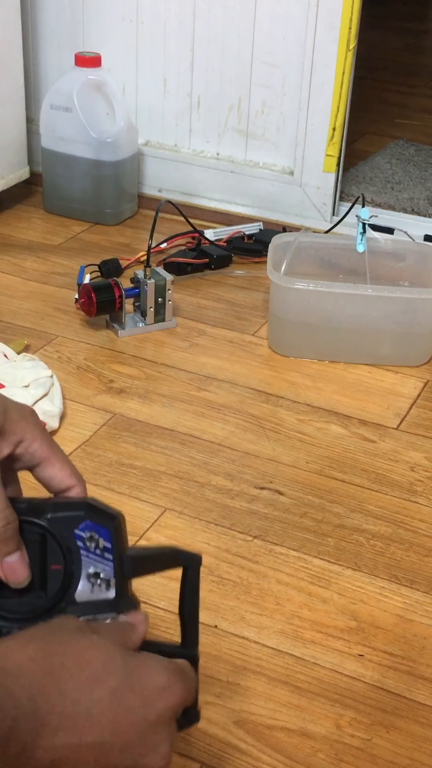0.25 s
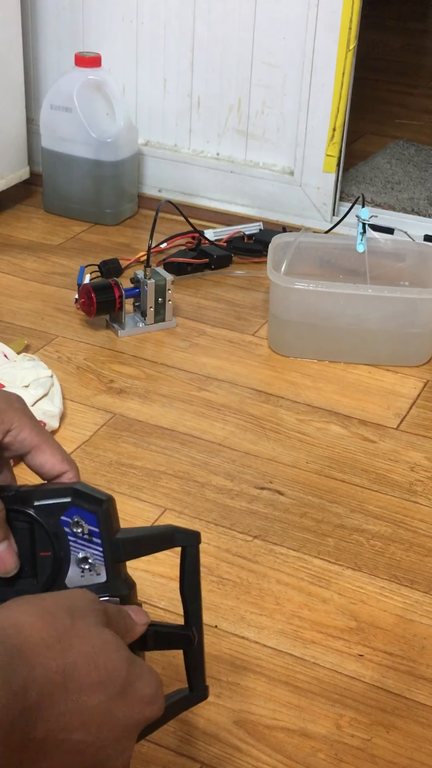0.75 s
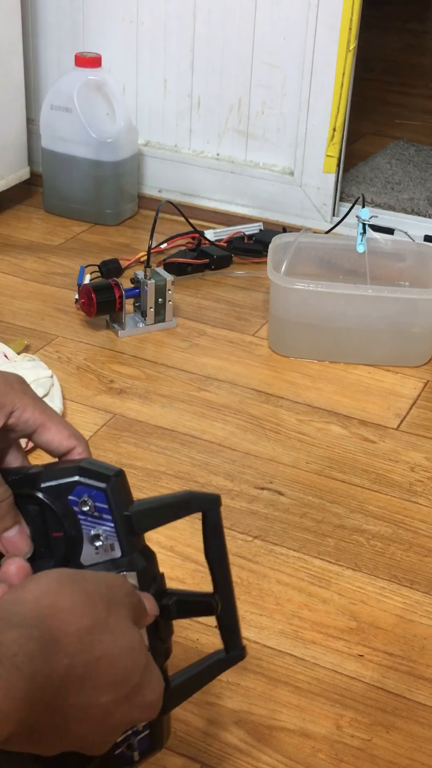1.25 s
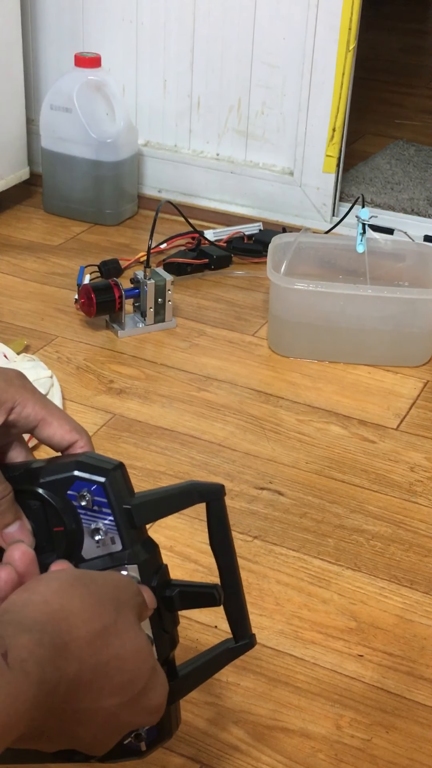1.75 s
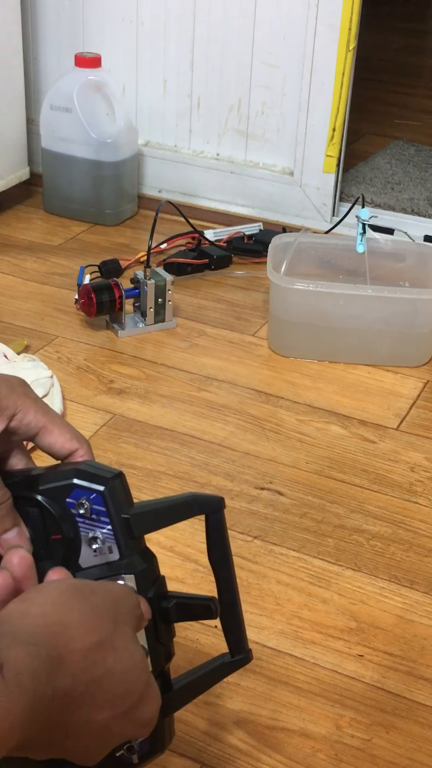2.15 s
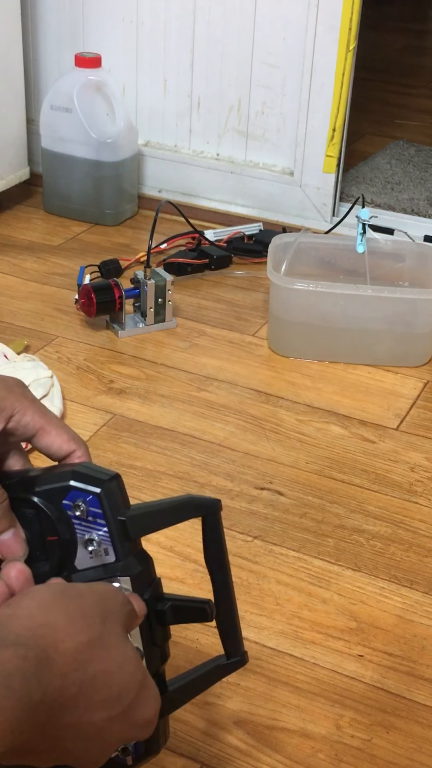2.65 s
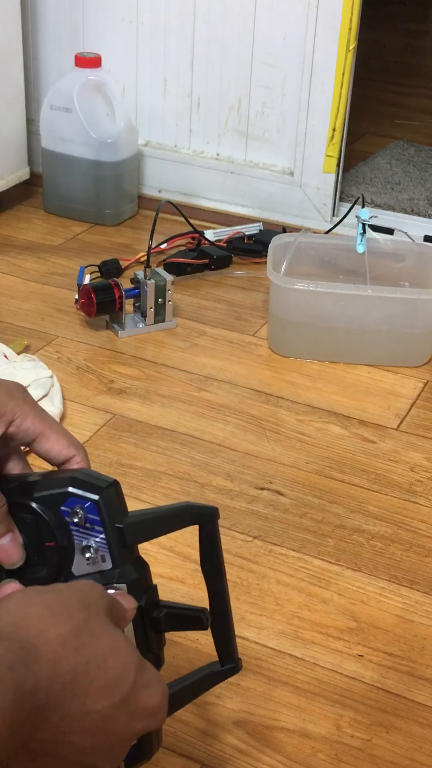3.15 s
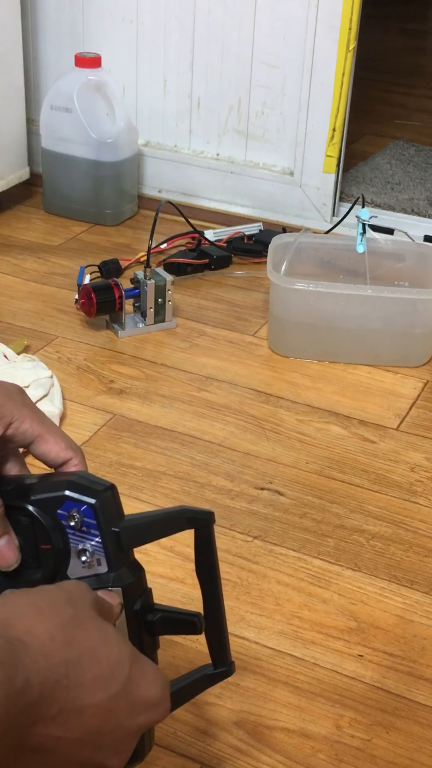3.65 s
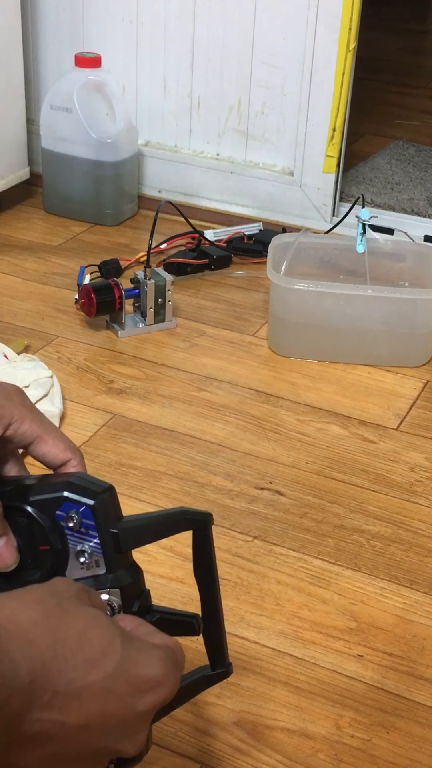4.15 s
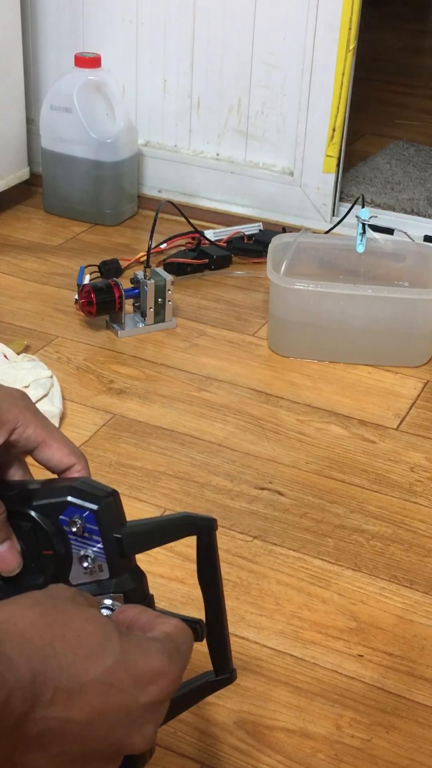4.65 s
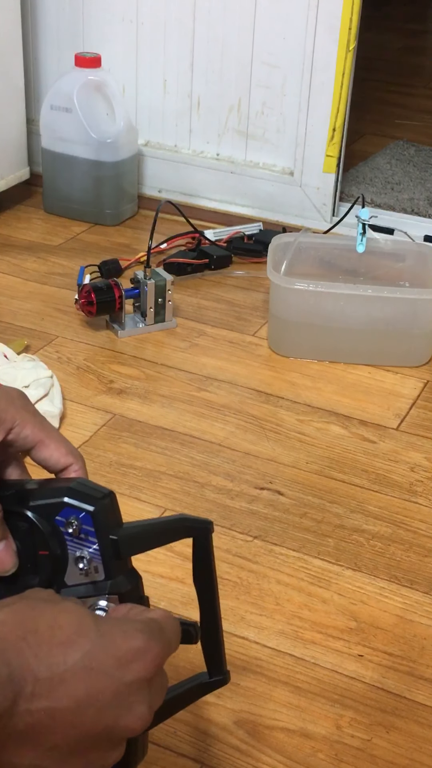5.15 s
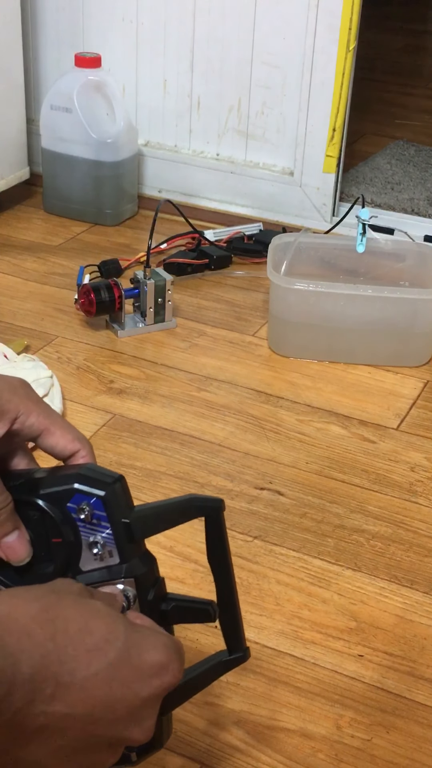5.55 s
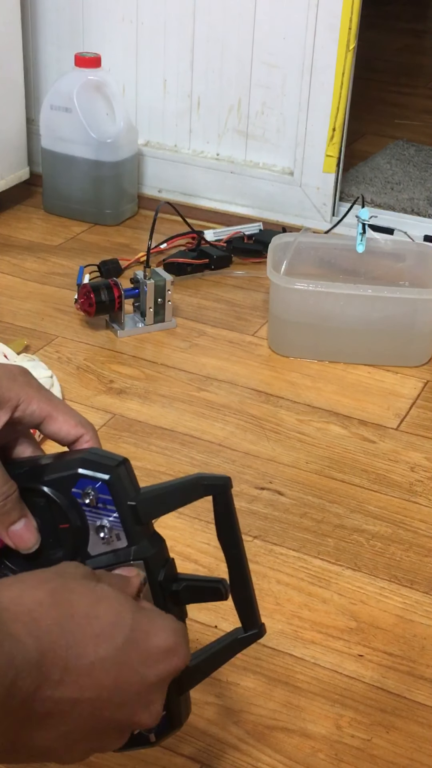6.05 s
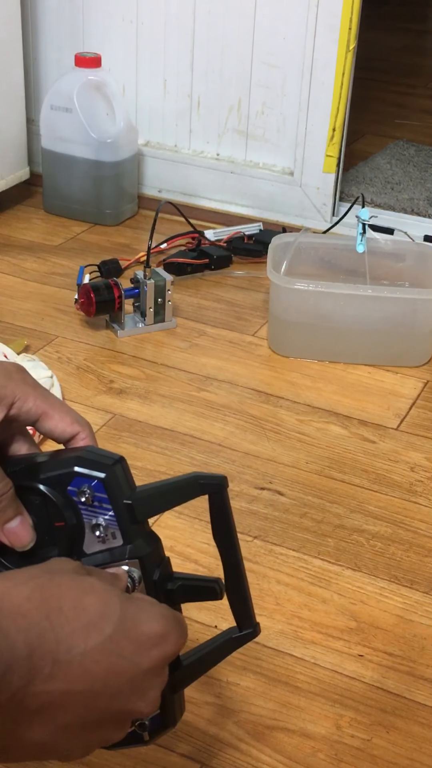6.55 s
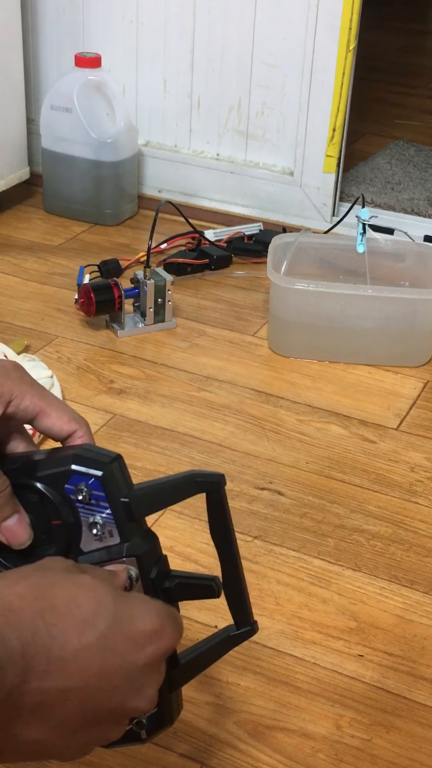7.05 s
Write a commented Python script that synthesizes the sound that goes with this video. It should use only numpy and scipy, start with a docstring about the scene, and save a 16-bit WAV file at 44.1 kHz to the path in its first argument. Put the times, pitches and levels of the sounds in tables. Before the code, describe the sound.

Steady electric whirring with tiny clicks stops for a second, a hand swishes on plastic, then the motor resumes as dishes clatter far off.

```python
"""A motor-driven gear pump whines, drones and whirrs on a wooden floor, with small ticks on top.
It falls quiet for about a second, then restarts with a thin whistle from its speed controller.
Further off in an echoing house come knocks, thumps, crockery, an appliance hum and a rumble; a hand swishes.
The pump and the swish are shaped noise, the whistle is narrow noise, the hum and ticks are sine tones.
Knocks and thumps are fading noise; crockery adds ringing sine tones to it."""
import sys
import numpy as np
from scipy import signal
from scipy.fft import rfft, irfft, next_fast_len
from scipy.io import wavfile
from scipy.ndimage import uniform_filter1d, map_coordinates

SR = 44100
rng = np.random.default_rng(int(sys.argv[2]) if len(sys.argv) > 2 else 0)


def transcribe(u):
    """Save the signal u as a 16-bit wav file named by the first command-line argument.

    u: samples, shape (n,) or (channels, n), limited to [-1, 1]; the rate is SR.
    q: integer samples, one column per channel.
    """
    v = np.clip(np.atleast_2d(u).T, -1, 1)
    q = np.round(v * 32767).astype(np.int16)
    wavfile.write(sys.argv[1], SR, q)


N = 322812
T = np.arange(N) / SR  # time of every sample in seconds

# In resonance tables each row is: centre in Hz, width in Hz, strength in dB.
# The pump housing, before its response is raised to a power.
HOUSING_MODES = [(2530, 50, -7), (2586, 28, -1), (2623, 30, 0), (2700, 60, -6), (2830, 200, -11)]
# Floor boards under the pump, before squaring. Each row: centre in Hz, width in Hz, strength in dB.
BOARD_MODES = [(82.4, 34, -4), (300.7, 20.7, -0.5), (370, 38, 0), (587.4, 32, -2.5), (940, 36, -3),
               (1054, 30, -7)]
# The motor bell. Each row: centre in Hz, width in Hz, strength in dB.
BELL_MODES = [(5700, 180, -11), (8800, 120, -13), (11300, 160, -9), (14800, 230, -24)]
# The whirr before the bell colours it. Each row: frequency in Hz, relative level in dB per Hz.
WHIRR_SPECTRUM = [(290, -46), (500, -2.5), (586, -4.5), (659, 0), (933, -2), (2190, -4), (2610, -2),
                  (3200, -14.5), (7640, -16.5), (8830, -15.5), (16000, -20)]
# Load on the pump: it runs, coasts, rests, crawls and picks up again.
# Each row: time in seconds, level in dB relative to full speed.
LOAD_CURVE = [(0, 0), (4.26, 0), (4.38, -1.5), (4.5, -7), (4.6, -30), (5.55, -23), (5.61, -5), (6.45, -3),
              (6.95, 0), (7.32, 0.5)]

# Steady air of the house. Each row: frequency in Hz, relative level in dB per Hz.
AIR_SPECTRUM = [(15, -26), (25, 2.5), (145, -8), (175, -8.5), (293, -2), (416, -2.5), (624, -7), (695, -9),
                (775, -6), (1260, -5.5), (2840, -15), (3920, -12.5), (7710, -17), (16000, -30)]
# Appliance tones. Each row: frequency in Hz, peak level in dB before the slow wavering.
HUM_TONES = [(177.6, -59.5), (414.5, -53), (506.0, -61), (705.2, -63), (823.6, -57.5), (963.6, -61),
             (1238, -55.5), (2062, -59.5)]
# Distant rumble. Each row: time in seconds, level in dB.
RUMBLE_CURVE = [(0, -60), (1.5, -61), (3, -70), (4.3, -56), (4.7, -65.5), (7.32, -68)]

# Clear ticks of the coupling. Each row: start in seconds, starting strength in dB, pitch in Hz.
CLEAR_TICKS = [(0.6195, -28, 6030), (0.823, -35, 8930), (0.8844, -31, 5900), (1.7739, -35, 8940),
               (2.2298, -28, 5900), (2.4703, -28, 8900), (2.5721, -34, 8930), (2.9442, -32, 8930),
               (3.131, -34, 8920), (3.707, -35, 6200), (3.917, -30, 5860), (3.9789, -31, 8760),
               (4.4844, -31, 6160), (5.6094, -37, 8000), (6.2794, -29, 8300)]

# Dull knocks. Each row: start in seconds, level in dB, rise in seconds, treble tilt in dB per octave.
KNOCK_EVENTS = [(.738, -32, .012, -2.5), (.79, -35.5, 0.024, -2), (1.517, -25.5, 0.016, -2),
                (1.555, -31.5, 0.011, -5), (1.802, -28, 0.015, -2.1), (1.845, -30, 0.047, -5.5),
                (1.905, -26.5, 0.011, -1), (1.975, -26, 0.027, 1.1), (2.03, -25, 0.016, 1.5),
                (2.07, -35.5, .0042, -0.5), (2.69, -35, 0.031, -0.3), (5.975, -29.5, 0.024, -10)]
# Knock colour before the cupboard rings. Each row: frequency in Hz, relative level in dB per Hz.
KNOCK_SPECTRUM = [(88, -44), (150, -26), (205, -23), (301, -6.5), (726, -10.5), (973, -8.5), (1150, -8),
                  (1850, -10.5), (2390, -14.5), (4540, -19.5), (12000, -44.5), (15600, -71), (22000, -120)]
# The knocked cupboard. Each row: centre in Hz, width in Hz, strength in dB.
CUPBOARD_MODES = [(283, 100, -1), (980, 44, -1.5), (1690, 250, 2), (3700, 83, -4)]
# How fast each pitch of a blow dies away. Each row: frequency in Hz, share of the decay time.
DECAY_SHARE = [(200, 0.9), (1500, 1.07), (7000, 0.98), (11000, 0.7), (16000, 0.61)]
# Floor thumps. Each row: start in seconds, level in dB.
THUMP_EVENTS = [(0.74, -34), (0.901, -35), (1.9, -32), (2.031, -36), (5.588, -30), (5.976, -25),
                (6.023, -42)]
# Floor joists, before squaring. Each row: centre in Hz, width in Hz, strength in dB.
JOIST_MODES = [(88, 39, 5.5), (144, 63, -0.5), (60, 20, -31), (243, 43, 0.5)]

# Clatter of crockery. Each row: start in seconds, level in dB, rise in seconds, treble tilt in dB per octave.
CLATTER_EVENTS = [(.897, -30, 0.0085, -3), (1.137, -32.5, 0.0072, 0.5), (1.165, -39.5, 0.0077, 1.1),
                  (5.97, -17.5, 0.013, -0.36), (6.03, -28, 0.01, 0.7), (6.275, -43, .0054, 9)]
# Clatter colour before the tilt. Each row: frequency in Hz, relative level in dB per Hz.
CLATTER_SPECTRUM = [(71, -46), (120, -20), (250, -8), (400, -10), (569, -10), (900, -6), (1550, -7),
                    (2500, -8.5), (4000, -11), (7000, -11.5), (9500, -15), (12000, -23.5), (16000, -26)]
# Ringing tones of a bowl. Each row: pitch in Hz, relative level in dB, time to fall 60 dB in seconds.
BOWL = [(537, -6, 0.19), (924, 3, 0.25), (1890, 1, 0.23), (2310, -2.5, 0.21), (3155, -3.5, 0.25),
        (4010, -7.5, 0.21), (4750, -22, .3), (5254, -19, .3), (6440, -29, .3)]
# Ringing tones of a cup. Each row: pitch in Hz, relative level in dB, time to fall 60 dB in seconds.
CUP = [(536, -9, 0.17), (927, -3.5, 0.27), (1563, -3.5, 0.25), (1850, -19, 0.55), (2299, -17, 0.5),
       (2464, -5.5, 0.27), (3540, -26, 0.49), (4720, -14, 0.27), (7350, -25, 0.47), (9600, -34, 0.32)]
# Ringing tones of a plate. Each row: pitch in Hz, relative level in dB, time to fall 60 dB in seconds.
PLATE = [(673, -8.5, 0.44), (865, -4.5, 0.43), (940, -6, 0.22), (1475, -27, 0.35), (1593, 1, 0.46),
         (1810, -12, 0.65), (2180, -28, 0.26), (3520, -13, 0.5), (3900, -8, 0.46), (5320, -12, 0.46),
         (6470, -16.5, 0.56), (6840, -18, 0.38), (8420, -13, 0.4), (11300, -16, 0.37)]
# Pieces being set down. Each row: table of ringing tones, start in seconds, level in dB.
PIECES_SET_DOWN = [(BOWL, .897, -20), (BOWL, 0.97, -33.5), (CUP, 1.138, -19), (CUP, 1.165, -27.5),
                   (PLATE, 5.97, -13)]

# Skin rubbing on plastic. Each row: frequency in Hz, relative level in dB per Hz.
SKIN_SPECTRUM = [(600, -10), (1300, 5.5), (2300, -13), (3800, -17), (5000, -8), (10000, -14), (15000, -21)]

# Whistles while the motor crawls. Each row: start in seconds, end in seconds, level in dB.
WHISTLE_EVENTS = [(5.55, 5.91, -48), (6.1, 6.447, -48.5)]
# The whistle's tone, before squaring. Each row: centre in Hz, width in Hz, strength in dB.
WHISTLE_LOWER = [(7450, 450, -3), (7920, 400, 0)]
# The octave above it, before squaring. Each row: centre in Hz, width in Hz, strength in dB.
WHISTLE_UPPER = [(15200, 350, -3), (15640, 350, 0)]

SHAFT_HZ = 41.4  # average turns per second
WHINE_DB, DRONE_DB, WHIRR_DB = -44, -45.5, -46  # at full speed
DRONE_FOLLOWS, WHIRR_FOLLOWS = 1.2, 0.48  # dB for each dB of load
AIR_DB = -43.5
FAINT_DB, FAINT_SPREAD_DB = -47, 17  # lowest strength of faint ticks at 6000 Hz and full speed; random extra
KNOCK_T60_S, CLATTER_T60_S, THUMP_T60_S = 0.43, 0.47, 0.46  # seconds to fall 60 dB; blows scale by pitch
SOFT_DB, EARLY_PER_DB = -36.5, 0.04  # harder blows than this stand out in their first arrivals
SLIDE_S, SLIDE_DB = 4.88, -39  # fastest moment of the hand, and the level there
SLIDE_RISE_DB_PER_S, SLIDE_FALL_DB_PER_S = 190, 120
OCTAVE_DB = -3.5  # upper whistle band against the lower one
WHISTLE_ATTACK_S, WHISTLE_RELEASE_S = 0.028, 0.046
TOP_HZ = 15750  # nothing is kept from here up


def amp(db):
    """Turns a level in dB into a gain."""
    return 10 ** (np.asarray(db) / 20)


def unit(x):
    """Scales a sound to an average (rms) strength of 1."""
    return x / np.sqrt(np.mean(x ** 2) + 1e-20)


def noise(size=N):
    """White noise: every frequency equally strong."""
    return rng.standard_normal(size)


def along(points, hz):
    """Reads a value between (Hz, value) points, on a log frequency axis."""
    f, v = np.transpose(points)
    return np.interp(np.log(hz + 1), np.log(f + 1), v)


def curves(rows):
    """Draws one value per sample for each column after the time; -120 outside the rows."""
    s, *cols = np.transpose(rows)
    return [np.interp(T, s, c, left=-120, right=-120) for c in cols]


def wobble(rate, size=N):
    """A smooth random curve through `rate` random points a second."""
    points = noise(int(size * rate / SR) + 4)
    return map_coordinates(points, [np.arange(size) * rate / SR])


def filtered(x, response):
    """Changes each frequency of x by the response at that frequency."""
    m = next_fast_len(len(x) + 8192)  # spare room for the ringing
    spectrum = rfft(x, m) * response(np.fft.rfftfreq(m, 1 / SR))
    return irfft(spectrum, m)[:len(x)]


def body(modes):
    """Response of an object with a few resonances, added with alternating signs."""
    def response(f):
        total = 0
        for k, (centre, width, db) in enumerate(modes):
            resonance = 1j * f * width / (centre * centre - f * f + 1j * f * width)
            total = total + (-1) ** k * amp(db) * resonance
        return total
    return response


def colour(points):
    """Response that follows a (Hz, dB) spectrum."""
    return lambda f: amp(along(points, f))


def ringing_noise(modes, size=N):
    """Noise through resonances; squaring the response makes each one stand out more sharply."""
    return unit(filtered(noise(size), lambda f: body(modes)(f) ** 2))


def add(out, s, sound):
    """Mixes a sound in at time s."""
    part = out[round(s * SR):][:len(sound)]
    part += sound[:len(part)]


def patchy(depth_db):
    """White noise with patches of random gain in time and frequency."""
    z = signal.stft(noise(N + 512), nperseg=512)[2]
    field = uniform_filter1d(noise(z.shape), size=7, axis=0)
    field = uniform_filter1d(field, size=8, axis=1)
    return signal.istft(z * amp(depth_db * unit(field)), nperseg=512)[1][:N]


def pump():
    """Gear teeth scrape twice a turn; the noise rings housing and floor boards."""
    load_db, = curves(LOAD_CURVE)
    turn = 2 * np.pi * np.cumsum(SHAFT_HZ * (1 + 0.00548 * wobble(2.995))) / SR
    mesh = 1 + .06 * np.cos(turn) + .17 * np.cos(2 * turn) + .11 * np.cos(4 * turn)
    housing, bell = body(HOUSING_MODES), body(BELL_MODES)
    whine = mesh * unit(filtered(noise(), lambda f: np.abs(housing(f)) ** 1.31))
    drone = ringing_noise(BOARD_MODES)
    whirr_response = lambda f: colour(WHIRR_SPECTRUM)(f) * (1 + np.abs(bell(f)))
    whirr = unit(filtered(mesh * patchy(depth_db=1.5), whirr_response))
    # each part wavers a little in level by itself
    whine_gain = amp(WHINE_DB + load_db + 0.42 * wobble(9.5))
    drone_gain = amp(DRONE_DB + DRONE_FOLLOWS * load_db + 0.28 * wobble(9))
    whirr_gain = amp(WHIRR_DB + WHIRR_FOLLOWS * load_db + 0.2 * wobble(11))
    return whine_gain * unit(whine) + drone_gain * drone + whirr_gain * whirr


def house():
    """Wavering sine tones of an appliance over the steady, noisy air of the house."""
    tones = np.zeros(N)
    for hz, db in HUM_TONES:
        tones += amp(db) * np.sin(2 * np.pi * hz * T + 0.67 * wobble(4))
    air = unit(filtered(patchy(depth_db=1.5), colour(AIR_SPECTRUM)))
    return amp(2.0 * wobble(4.33)) * tones + amp(AIR_DB + 0.33 * wobble(3.0)) * air


def rumble():
    """Deep noise around two low resonances swells through the house."""
    level_db, = curves(RUMBLE_CURVE)
    return amp(level_db) * ringing_noise([(41, 9, 0), (85, 30, -2)])


def ticks():
    """Loose play in the shaft coupling ticks on the motor bell: a few clear ticks over many faint ones."""
    out, t = np.zeros(N), np.arange(SR // 40) / SR
    load_db, = curves(LOAD_CURVE)
    draw = rng.random((900, 4))  # one row for each faint tick
    s = draw[:, 0] * (N - 1) / SR
    pitches = np.array([8900, 8900, 5900, 6400, 14000])  # 8900 Hz is twice as likely
    hz = pitches[(5 * draw[:, 1]).astype(int)] * (1 + .09 * (draw[:, 2] - .5))
    faint_db = FAINT_DB + load_db[(s * SR).astype(int)]
    faint_db = faint_db + FAINT_SPREAD_DB * draw[:, 3] ** 3  # the cube keeps most of them weak
    faint_db = faint_db - 3 * np.log2(hz / 6000)  # higher ticks are weaker
    shape = amp(-60 * t / 0.0085) * (1 - np.exp(-t / 0.00033))  # quick rise, quick decay
    for start, db, pitch in [*CLEAR_TICKS, *np.c_[s, faint_db, hz]]:
        add(out, start, amp(db) * shape * np.sin(2 * np.pi * pitch * t))
    echo = noise(SR // 4) * amp(-60 * T[:SR // 4] / 0.23)
    return out + amp(-4) * signal.fftconvolve(out, echo / np.linalg.norm(echo))[:N]


def blows(table, t60, response):
    """Far blows: the sound builds up through many walls, then the treble dies first."""
    out = np.zeros(N)
    for s, db, rise, tilt_db in table:
        hz, t, z = signal.stft(noise(SR // 2), SR, nperseg=256)
        decay_s = (t60 * along(DECAY_SHARE, hz))[:, None]
        z = z * amp(-60 * np.maximum(t - rise, 0) / decay_s)
        burst = signal.istft(z, SR, nperseg=256)[1]
        tilt = lambda f: amp(tilt_db * np.log2(np.maximum(f, 150) / 1000))
        burst = filtered(burst, lambda f: response(f) * tilt(f))
        burst = burst / np.std(burst[:SR // 30])
        t = T[:len(burst)]
        early = EARLY_PER_DB * max(db - SOFT_DB, 0)
        # the nearest walls arrive together
        first = 1 + early * np.exp(-np.abs(t - rise) / np.where(t < rise, .006, .014))
        clumps = amp(0.89 * wobble(98.6, size=len(t)))  # echoes come in clumps
        build_up = np.clip(t / rise, 0, 1) ** 0.54
        add(out, s, amp(db) * burst * build_up * first * clumps)
    return out


def knocks():
    """Blows on a wooden cupboard, whose resonances add to the dull noise."""
    cupboard = body(CUPBOARD_MODES)
    response = lambda f: colour(KNOCK_SPECTRUM)(f) * (1 + np.abs(cupboard(f)))
    return blows(KNOCK_EVENTS, KNOCK_T60_S, response)


def thumps():
    """The joists boom under heavy contacts: low noise that rises fast and dies away."""
    out, t = np.zeros(N), T[:SR // 2]
    shape = amp(-60 * t / THUMP_T60_S) * (1 - np.exp(-t / 0.014))
    for s, db in THUMP_EVENTS:
        add(out, s, amp(db) * shape * ringing_noise(JOIST_MODES, len(t)))
    return out


def crockery():
    """Pieces clatter and ring with their own tones; echoes smear them, the high ones most."""
    out, t = blows(CLATTER_EVENTS, CLATTER_T60_S, colour(CLATTER_SPECTRUM)), T[:SR // 2]
    swell = np.clip(t / .014, 0, 1) ** 1.4
    for modes, s, db in PIECES_SET_DOWN:
        for hz, level_db, t60 in modes:
            pace = 40 + .025 * hz  # higher tones flutter faster
            flutter = amp(3 * wobble(pace, size=len(t)))
            tone = np.sin(2 * np.pi * hz * t + 1.3 * wobble(pace, size=len(t)))
            add(out, s, amp(db + level_db - 60 * t / t60) * swell * flutter * tone)
    return out


def slide():
    """A hand's skin sticks and slips on the plastic casing: a grainy swish that swells and fades."""
    slope = np.where(T < SLIDE_S, SLIDE_RISE_DB_PER_S, SLIDE_FALL_DB_PER_S)
    stroke_db = SLIDE_DB - slope * np.abs(T - SLIDE_S)
    grain = amp(1.2 * wobble(160))
    return amp(stroke_db) * unit(grain * filtered(noise(), colour(SKIN_SPECTRUM)))


def whistle():
    """Unsteady switching smears the controller's tone and its octave into narrow hiss."""
    on = np.zeros(N)
    for start, end, db in WHISTLE_EVENTS:
        attack = np.clip((T - start) / WHISTLE_ATTACK_S, 0, 1)
        release = np.exp(-np.maximum(T - end, 0) / WHISTLE_RELEASE_S)
        on += amp(db) * attack * release
    lower = amp(1.9 * wobble(25)) * ringing_noise(WHISTLE_LOWER)
    upper = amp(OCTAVE_DB + 3 * wobble(25)) * ringing_noise(WHISTLE_UPPER)
    return on * (lower + upper)


def scene():
    """Everything meets at one microphone."""
    near = pump() + ticks() + slide() + whistle()
    far = house() + rumble() + knocks() + thumps() + crockery()
    return (near + far)[None]


def record(dry):
    """The phone cuts the deepest bass, rounds off the loudest peaks and keeps nothing above its band limit."""
    x = filtered(dry[0], lambda hz: 1 / (1 + (36 / (hz + 1e-3)) ** 8))
    x = x / (1 + np.abs(x / .9) ** 4) ** (1 / 4)
    return filtered(x, lambda hz: hz < TOP_HZ)[None]


dry = scene()
out = record(dry)
transcribe(out)
```